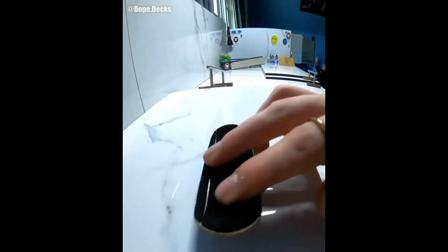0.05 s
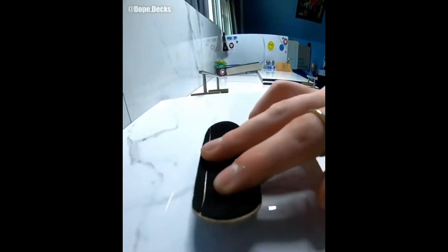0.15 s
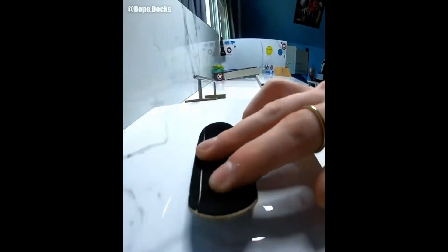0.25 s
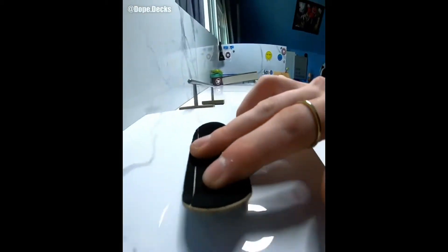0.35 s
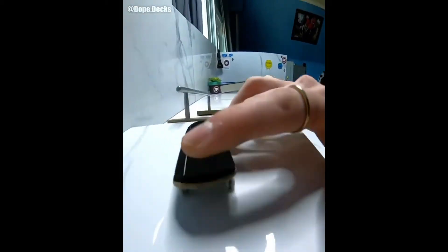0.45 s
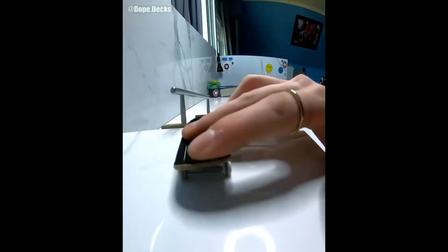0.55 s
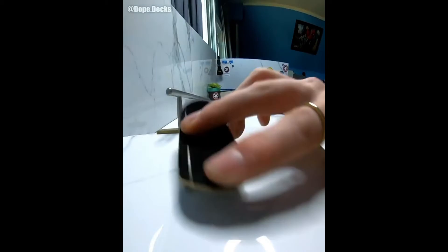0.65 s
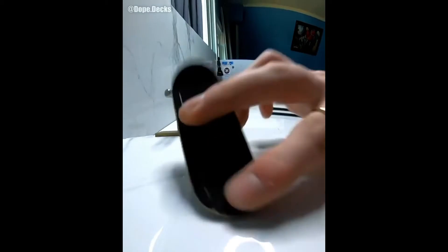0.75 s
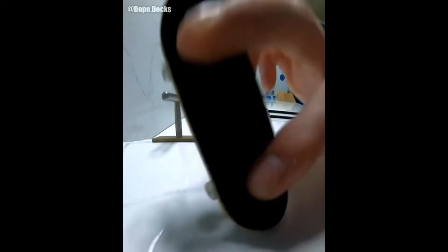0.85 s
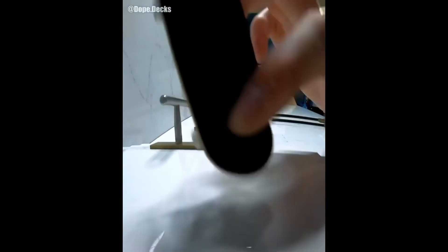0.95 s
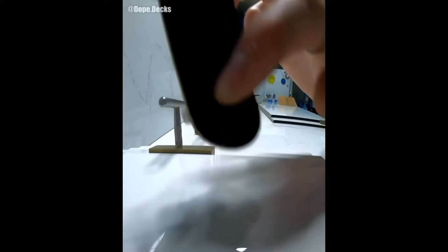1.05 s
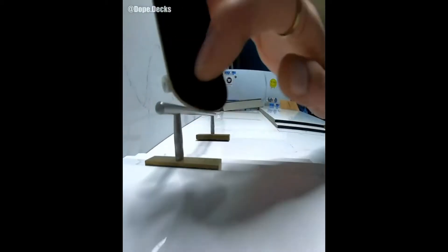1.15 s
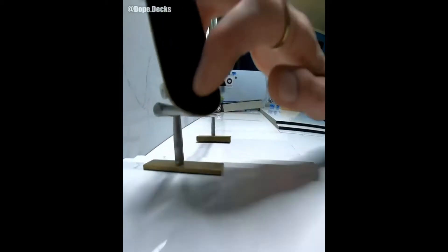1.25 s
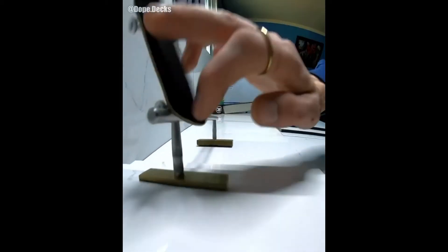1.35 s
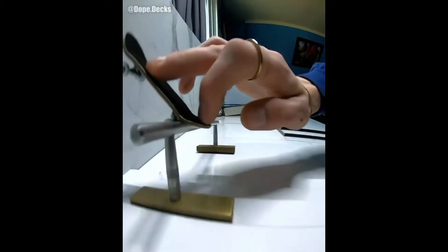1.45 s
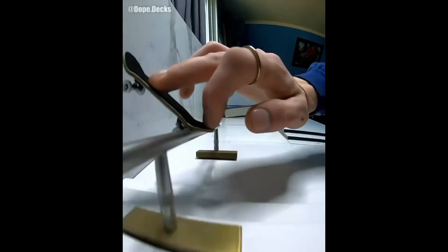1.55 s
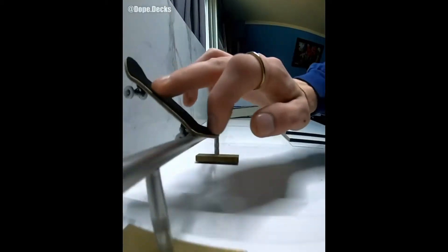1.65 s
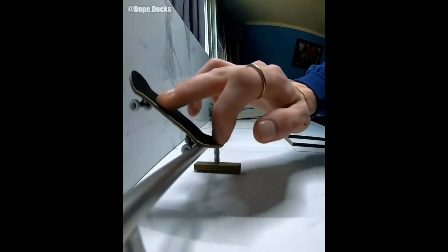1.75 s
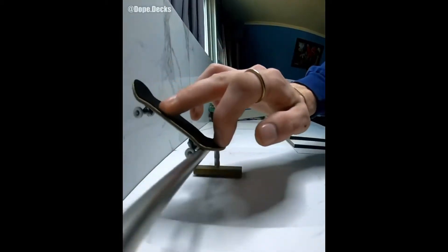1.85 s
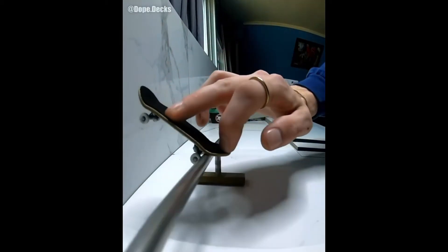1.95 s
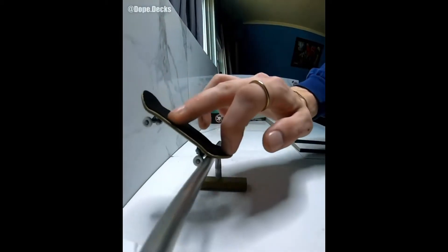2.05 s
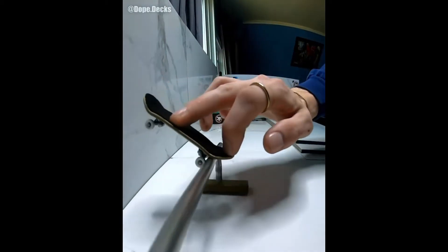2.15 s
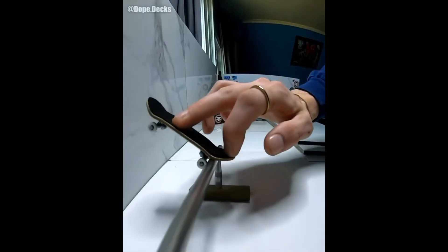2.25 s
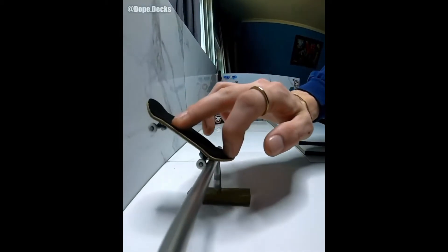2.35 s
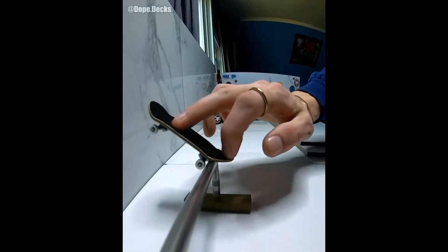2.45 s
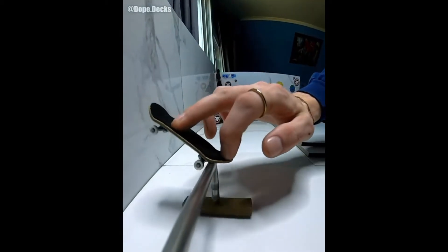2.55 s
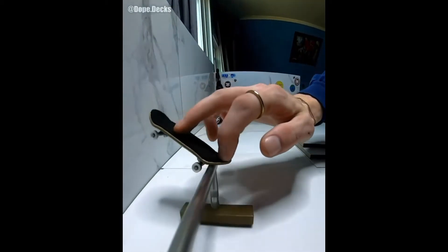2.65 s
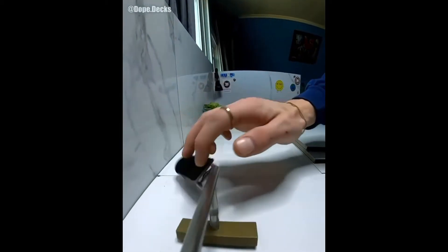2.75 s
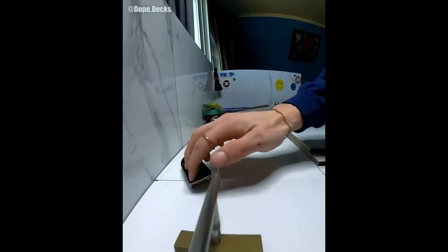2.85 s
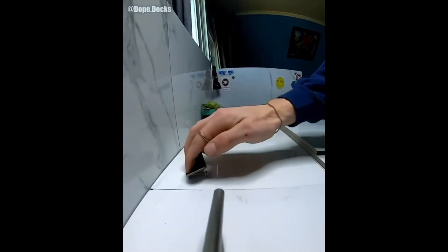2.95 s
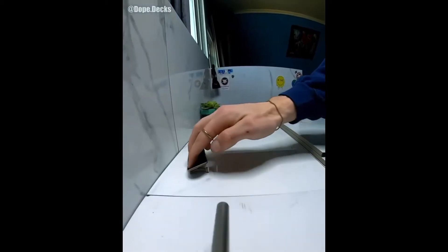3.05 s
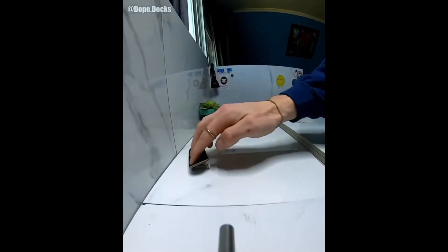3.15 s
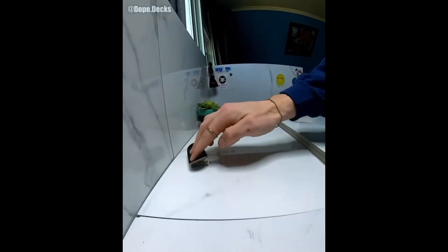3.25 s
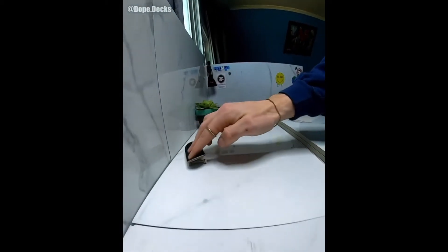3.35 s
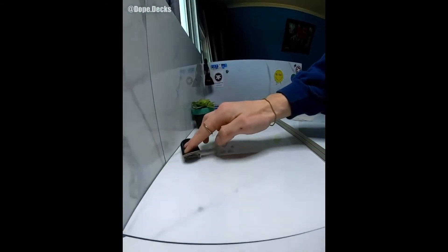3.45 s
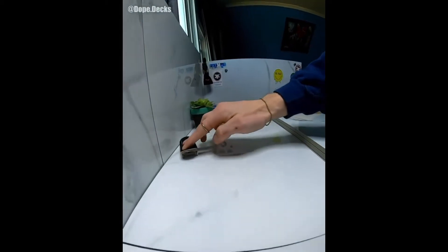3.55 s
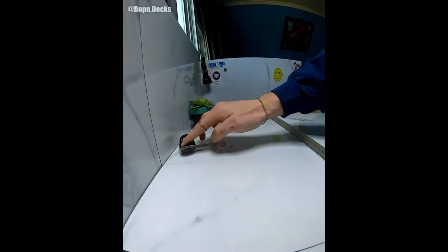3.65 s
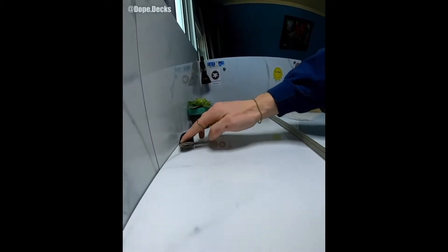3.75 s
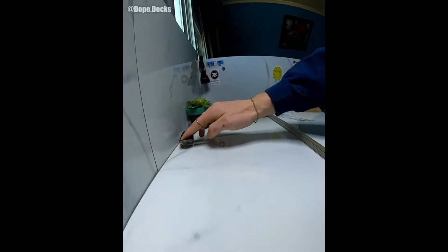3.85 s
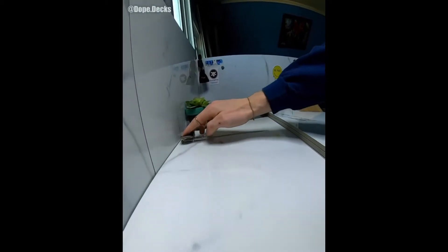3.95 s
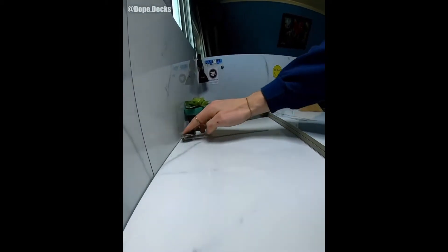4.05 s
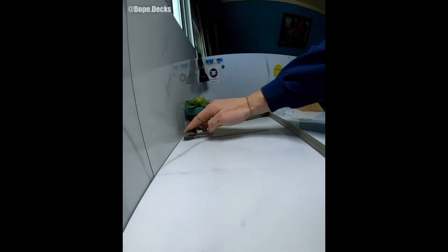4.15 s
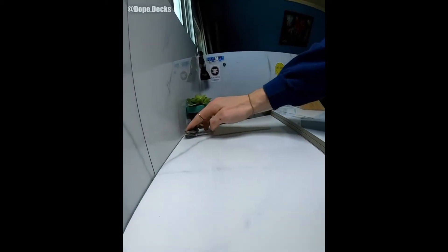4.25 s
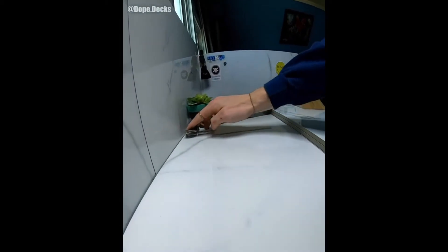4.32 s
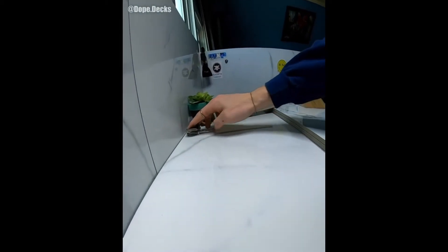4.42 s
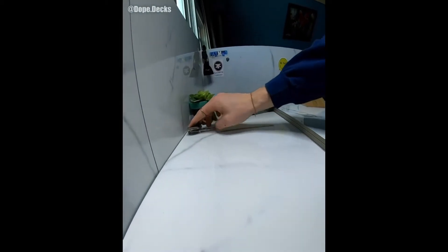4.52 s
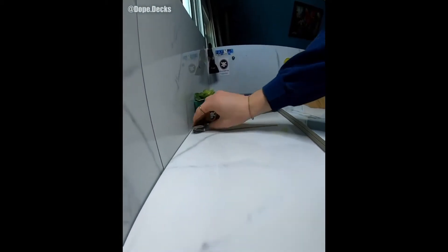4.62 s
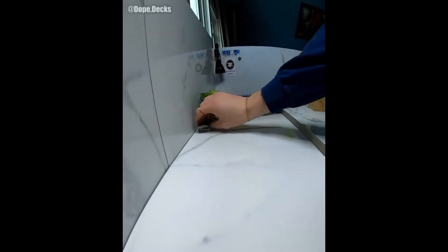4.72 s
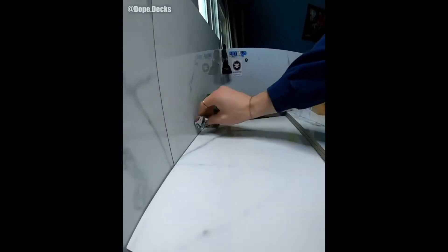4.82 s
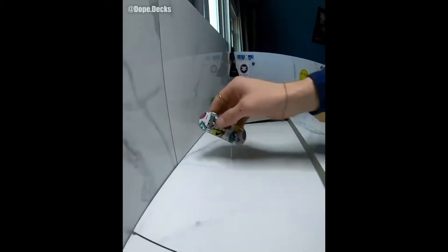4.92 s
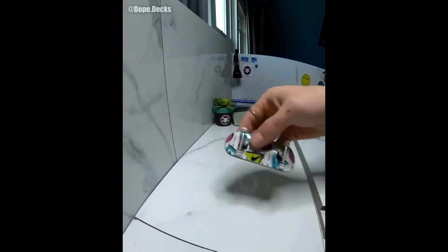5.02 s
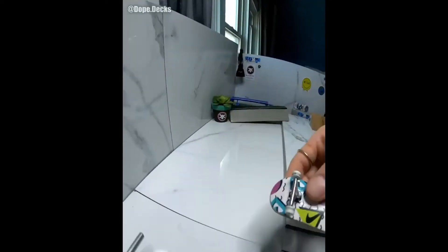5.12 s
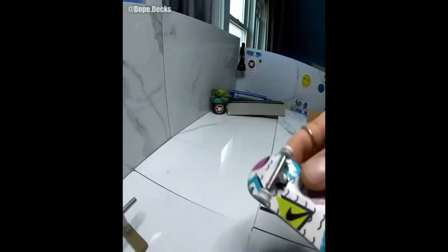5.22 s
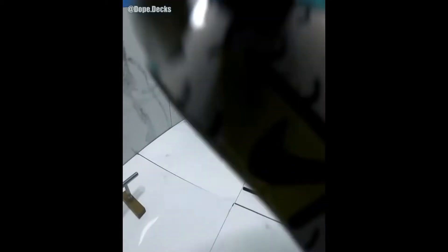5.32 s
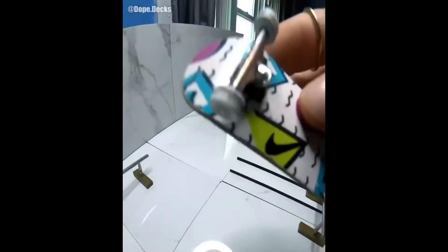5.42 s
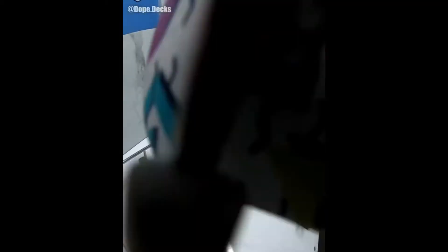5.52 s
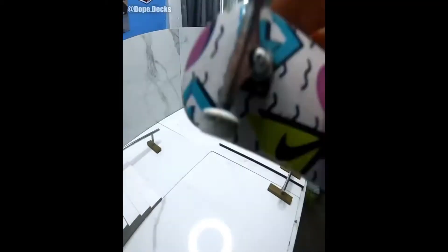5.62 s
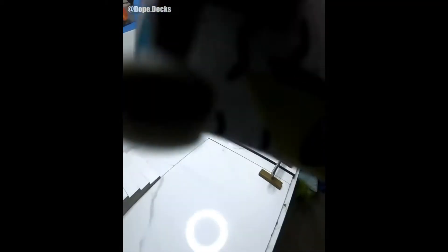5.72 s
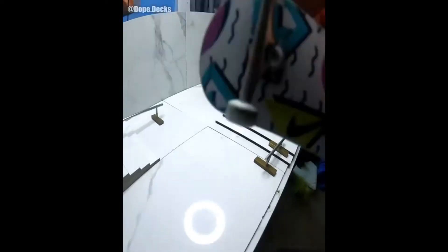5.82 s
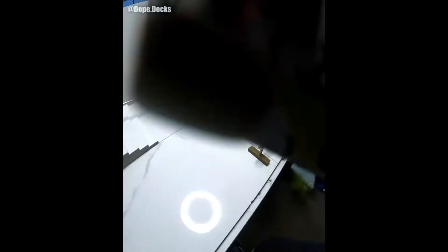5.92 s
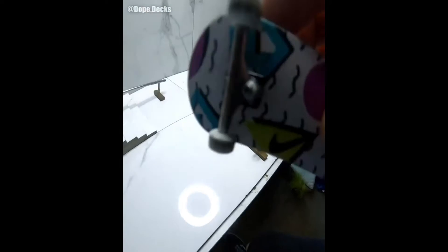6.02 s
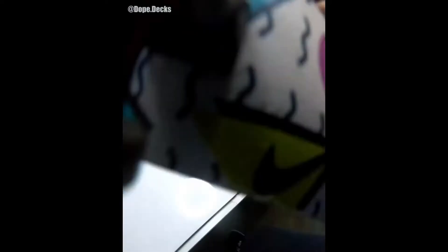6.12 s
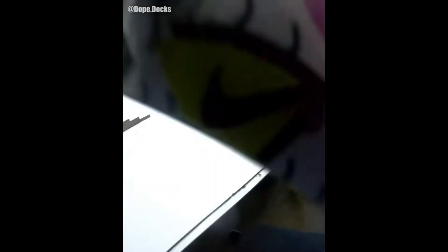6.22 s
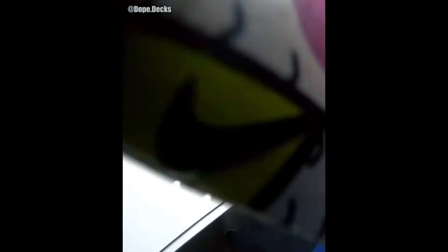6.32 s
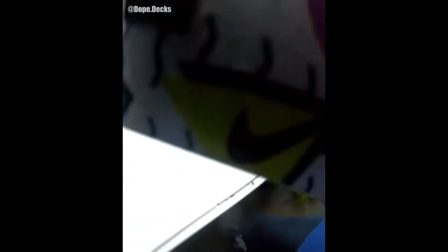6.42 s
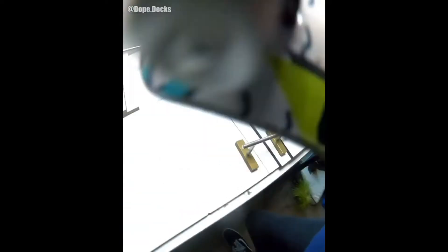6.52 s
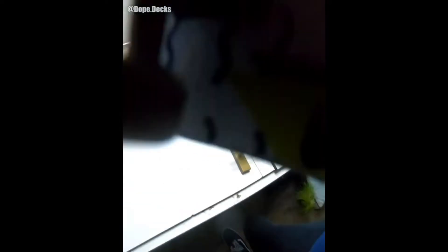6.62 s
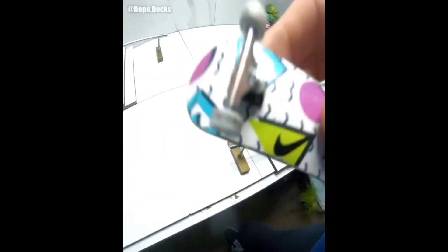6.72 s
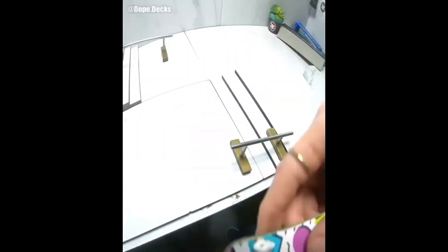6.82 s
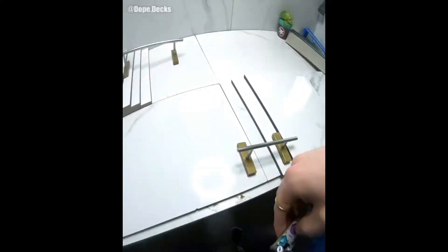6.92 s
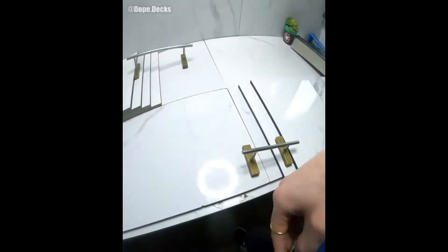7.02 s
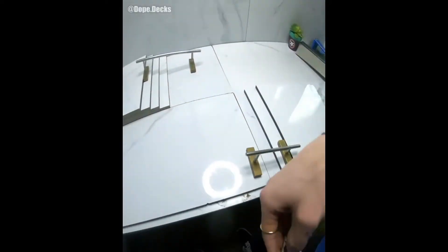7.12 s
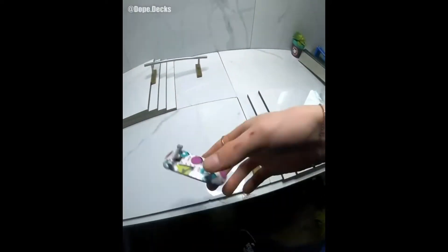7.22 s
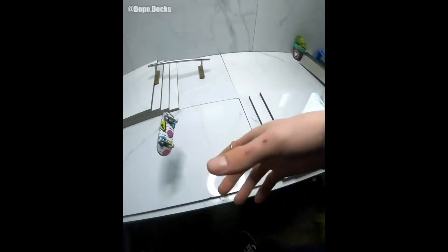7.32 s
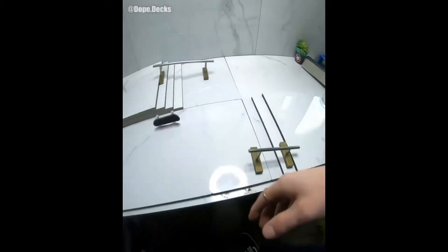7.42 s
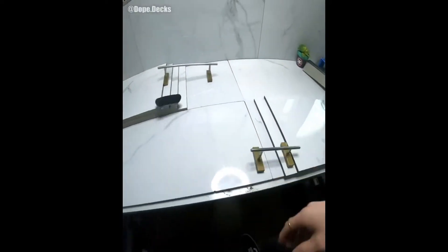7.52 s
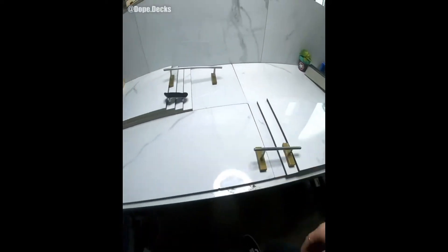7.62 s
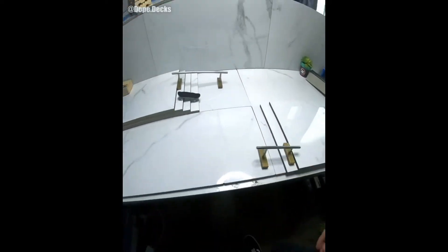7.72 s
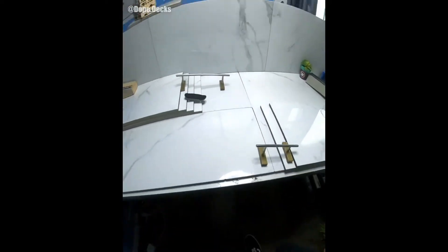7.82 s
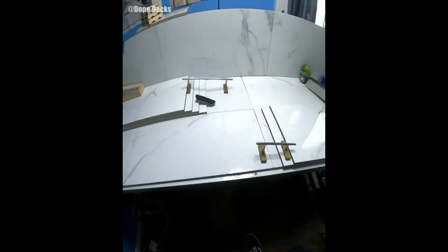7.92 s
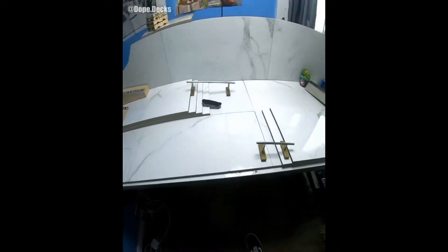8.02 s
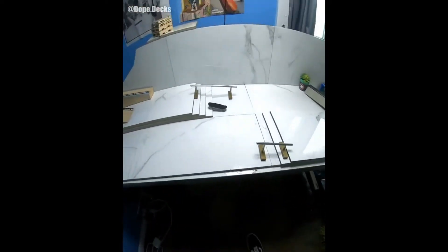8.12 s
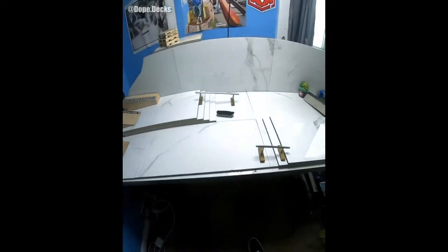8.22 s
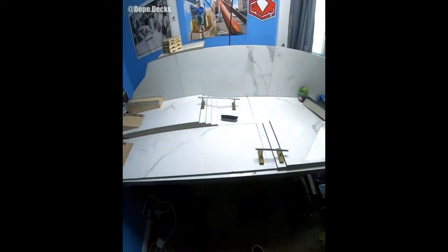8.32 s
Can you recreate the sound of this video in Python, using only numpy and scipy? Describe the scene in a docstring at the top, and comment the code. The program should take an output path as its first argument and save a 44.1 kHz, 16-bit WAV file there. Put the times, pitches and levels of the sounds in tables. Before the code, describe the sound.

Close camera microphone in a small hard-surfaced room. A finger-sized wooden skateboard rolls noisily, pops with a sharp tail crack in slow motion, lands on a metal rail and scrapes with brief bending squeaks. It slaps down in a burst of wheel and truck clicks, rolls away more softly and knocks the wall. A grab click, then eight heavy overloaded taps on the casing with short rushes and light rattles, then a toss and quickening, fading desk bounces.

```python
"""Small wheels roll over a stone-topped desk; a fingerboard pops in slow motion, grinds a metal rail with squeaks,
slaps down and rolls into the wall. Picked up, it taps the camera eight times, then is tossed and bounces to rest.
Wheels, scrapes and air are coloured noise; squeaks are bending stick-slip tones; blows are clicks with chatter and room
echo through a deck or camera case, with damped modes of desk, rail and trucks.
Slow playback lowers the blows and the end of the run-up, and stretches the blows' ring and echo."""
import sys
import numpy as np
from scipy import signal
from scipy.fft import rfft, irfft
from scipy.io import wavfile
from scipy.ndimage import uniform_filter1d, map_coordinates

SR = 44100
rng = np.random.default_rng(int(sys.argv[2]) if len(sys.argv) > 2 else 0)


def dump(signal):
    """Clip the signal to [-1, 1] and save it as 16-bit WAV at the path in sys.argv[1]."""
    limited = np.clip(np.atleast_2d(signal).T, -1, 1)
    pcm = np.round(limited * 32767).astype(np.int16)
    wavfile.write(sys.argv[1], SR, pcm)


N = 369110
TIME = np.arange(N) / SR
SIZE = 32768  # samples in one short sound or filter
AGE = np.arange(SIZE) / SR
MIDDLE_S = AGE.mean()
HZ = np.maximum(np.fft.rfftfreq(SIZE, 1 / SR), 1)
TOP_HZ = 12900  # upper limit of the microphone sound
POP_S, SKID_S, WALL_S = 0.722, 2.8, 4.064  # run-up ends, wheels skid after landing, wheels stop at the wall

# Playback speed: (time [s], share of real time)
SPEED = [(0, 1), (.487, 1), (.503, .33), (1.3, .33), (1.328, .55), (2.72, .56), (2.74, 1), (8.4, 1)]
# Resonances of the wooden deck: (frequency [Hz], width [Hz], relative level [dB])
DECK = [(710, 600, -4), (1155, 280, -6), (1840, 770, -4), (2200, 300, -10), (2600, 240, -7.5),
        (2990, 460, -7.5), (3350, 310, -4.5), (3880, 560, -6.5), (4200, 660, -9), (5650, 490, -5.5),
        (6710, 130, -7), (8450, 590, -15), (10200, 350, -28)]
# Resonances of the camera case: (frequency [Hz], width [Hz], relative level [dB])
CASE = [(193.5, 204, 11), (360, 120, 8.5), (624, 150, -2.5), (1236, 370, 4), (2520, 330, 0),
        (3300, 610, -6.5), (4630, 580, -4.5), (6950, 260, -28), (9820, 1200, -21.5)]
# Modes of the desk at full speed: (frequency [Hz], relative level [dB], t60 [s])
DESK = [(77.7, -12.5, 0.087), (174.2, -14, 0.99), (259, -6.5, 0.15), (357.6, 6.5, 0.17), (682, -3, 0.09),
        (1100, -6.5, 0.1)]
# Colour of wheels near the microphone: (frequency [Hz], relative level [dB per Hz])
NEAR_COLOUR = [(88, -44), (150, -16), (239, -12.5), (278, -8), (322, -2.5), (443, -14.5), (597, -8.5),
               (668, -11.5), (1330, 0.5), (2130, -12), (3150, -4), (5510, -18.5), (6280, -29),
               (10200, -38.5), (13000, -59.5)]
# Ways the board makes contact, at full speed:
# (strongest ring [Hz], hardness [dB per octave], desk boom [dB], chatter [dB], clear ring [dB])
TAIL = (2350, 2.5, -18.5, -8, -7.5)
DECK_FLAT = (3400.5, -0.5, -34.5, -17, 2)
TRUCK = (3902, 2.5, -21.5, -10, -8)
EDGE = (1899.5, 5, -19, -1.5, -13)
GLANCE = (2400, -0.5, -32, 7, -8.5)
WHEEL = (1598.5, -6, -12, -2.5, -9)
SETTLE = (899.5, -7, -6.5, 5.5, -3.5)
NUDGE = (1700, -4.5, 9.5, 11, -7.5)
GRAB = (2603, 1, -7, -0.5, -4.5)
SEAM = (8100, 13, -16, -1, -18)
ROCK = (1199, -2, -13, 15, -7)
WALL = (1450, -5, -19, -2.5, -8)
THUD = (230, -10, -4, 0, 4)


def undb(db):
    """Amplitude gain of a level in dB."""
    return np.exp(np.asarray(db) * np.log(10) / 20)


def unit(x):
    """Scale to an RMS of 1."""
    return x / np.sqrt(np.mean(x ** 2))


def burst(x):
    """Scale a short sound so that its energy equals 20 ms at level 0 dB."""
    energy = np.sum(x ** 2, axis=-1).mean()
    return x / np.sqrt(energy / (.02 * SR))


def curve(rows):
    """Straight lines through (time [s], value) points."""
    return np.interp(TIME, *np.array(rows).T)


def ramp(start_s, end_s):
    """Runs from 0 to 1 between two times."""
    return np.clip((TIME - start_s) / (end_s - start_s), 0, 1)


def hold(start_s, end_s, attack_s, release_s):
    """Envelope that rises until start_s, holds, and dies away after end_s."""
    before = np.maximum(start_s - TIME, 0) / max(attack_s, .0005)
    after = np.maximum(TIME - end_s, 0) / max(release_s, .0005)
    return np.exp(-before - after)


def swells(rows):
    """Gain of bell-shaped swells given as (time [s], half length [s], level [dB])."""
    return sum(undb(db) * np.exp(-.5 * ((TIME - s) / half_s) ** 2) for s, half_s, db in rows)


def fade(t60):
    """Decay by 60 dB in t60 seconds."""
    return undb(-60 * AGE / max(t60, .001))


def flicker(rate):
    """Smooth chance with an RMS of 1, newly drawn about rate times a second."""
    k = int(SR / rate)
    steps = np.repeat(rng.standard_normal(N // k + 1), k)
    return unit(uniform_filter1d(steps, k)[:N])


def noise(size, width):
    """Stereo noise; width is side over mid."""
    mid, side = rng.standard_normal((2, size))
    return unit(np.array([mid + width * side, mid - width * side]))


def narrow(width_hz, width):
    """Slow complex noise that turns a tone into a narrow band."""
    return low_pass(noise(N, width) + 1j * noise(N, width), width_hz, order=2)


def pan(db):
    """Channel gains for a left-minus-right level in dB."""
    return undb(np.array([[db], [-db]]) / 2)


def add(out, s, sound):
    """Mix a sound in at s seconds."""
    i = int(s * SR)
    out[:, i:i + sound.shape[1]] += sound[:, :N - i]


def low_pass(x, hz, order):
    """Causal Butterworth low-pass."""
    return signal.sosfilt(signal.butter(order, hz, fs=SR, output="sos"), x)


def colour(rows):
    """Spectrum in dB, joined up on a logarithmic frequency axis."""
    rows = np.array(rows)
    return np.interp(np.log(HZ), np.log(rows[:, 0]), rows[:, 1])


def resonances(rows, hz):
    """dB response of a set of resonances."""
    power = sum(undb(db) ** 2 / (1 + ((hz - f * f / hz) / width) ** 2) for f, width, db in rows)
    return 10 * np.log10(power)


def bump(hz, centre_hz, octaves):
    """Bell of height 1 around a frequency."""
    return np.exp(-.5 * (np.log2(hz / centre_hz) / octaves) ** 2)


def shape(x, db):
    """Causal filter with the given dB response, built from its cepstrum."""
    cepstrum = irfft(np.log(undb(db)))
    fold = 1 + np.sign(SIZE / 2 - np.arange(SIZE))
    causal = cepstrum * fold - cepstrum[0] * (AGE == 0)
    response = irfft(np.exp(rfft(causal)))
    return signal.fftconvolve(x, response[None], axes=1)[:, :x.shape[1]]


def comb(depth_db, longest_s):
    """Reflections off nearby surfaces cut peaks and notches into a sound: dB response."""
    lags, turns = rng.random((2, 12))
    coarse = HZ[::4]
    cycles = np.outer(coarse, longest_s * (.2 + .8 * lags)) + turns
    ripple = np.cos(2 * np.pi * cycles).sum(axis=1)
    return depth_db * unit(np.interp(HZ, coarse, ripple)) * HZ / (HZ + 1200)


def bend(x, lag_s, speed):
    """Bending waves carry the treble faster, so a click spreads into a tiny downward chirp."""
    delay = lag_s / speed / np.sqrt(1 + HZ / (1500 * speed))
    phase = 2 * np.pi * np.cumsum(delay) * SR / SIZE
    tail = np.minimum(10 * (1 - AGE / AGE[-1]), 1)
    return irfft(rfft(x) * np.exp(-1j * phase)) * tail


def ring(modes, speed, scatter=0.017, uneven_db=0):
    """Damped modes, a little different in pitch (and in strength if uneven) on every blow."""
    out = np.zeros(SIZE)
    for hz, db, t60 in modes:
        age = AGE[AGE < 2 * t60 / speed]
        detune, strength = rng.standard_normal(2)
        pitch = hz * speed * (1 + scatter * detune)
        decay = np.exp(-np.log(1000) * age * speed / t60)
        out[:len(age)] += decay * undb(db + uneven_db * strength) * np.sin(2 * np.pi * pitch * age)
    return burst(out)


def contact(chatter_db, chatter_t60, room_db, room_t60, width):
    """One sharp push, the grainy chatter of loose parts after it, and the room's answer."""
    grains = undb(3.6 * np.minimum(rng.exponential(size=SIZE), 4))
    chatter = burst(noise(SIZE, width) * grains * fade(chatter_t60))
    room = burst(noise(SIZE, width) * fade(room_t60) * (1 - fade(room_t60 / 10)))
    push = burst(1. * (AGE == 0))
    return push + undb(chatter_db) * chatter + undb(room_db) * room


def in_room(x, chatter_db, room_db, room_t60, width):
    """A sound together with its near reflections and the room's answer."""
    answer = contact(chatter_db, .028, room_db, room_t60, width)
    return signal.fftconvolve(x, answer, axes=1)[:, :N] / np.sqrt(SR / 50)


def friction(rows, body_db, lift_db, rough_db, width):
    """Short rubbing strokes, each bringing out the body's response near its own centre."""
    out = np.zeros((2, N))
    for s, half_s, db, hz in rows:
        grains = noise(SIZE, width) * undb(rough_db * flicker(rate=160)[:SIZE])
        stroke = unit(shape(grains, body_db + lift_db * bump(HZ, hz, octaves=0.34)))
        envelope = np.exp(-.5 * ((AGE - MIDDLE_S) / half_s) ** 2)
        add(out, s - MIDDLE_S, undb(db) * stroke * envelope)
    return out


def rush(db, rise_t60, hold_s, width):
    """A fluttering rush with the given dB response that swells, then holds briefly up to its end."""
    flutter = undb(2.5 * flicker(rate=350)[:SIZE])
    swell = np.minimum(fade(rise_t60) / undb(-60 * hold_s / rise_t60), 1)[::-1]
    return burst(shape(noise(SIZE, width), db + comb(depth_db=3.5, longest_s=.0025)) * flutter * swell)


def judder(x):
    """Four frequency bands of a moving contact each shake on their own."""
    # Edges between the bands: (frequency [Hz])
    band_edges = [700, 1800, 3600]
    below = [0]
    for hz in band_edges:
        below.append(signal.sosfiltfilt(signal.butter(2, hz, fs=SR, output="sos"), x))
    below.append(x)
    return sum((upper - lower) * undb(2.4 * flicker(rate=110)) for lower, upper in zip(below, below[1:]))


def travelling(x, db, depth_db, longest_s):
    """Colour a moving source; the reflections off desk and wall shift as the board travels."""
    turn = 1.19 * flicker(rate=22)
    here, there = (shape(x, db + comb(depth_db, longest_s)) for _ in range(2))
    return unit(here * np.cos(turn) + np.roll(there, shift=400, axis=1) * np.sin(turn))


def wheels(spectrum, grit_db, wobble_db, width):
    """Specks of the surface tick through wheels and desk; the uneven wheels make them come in bunches."""
    # What the rolling wheels ring with: (frequency [Hz], width [Hz], lift [dB])
    peaks = [(340, 240, 5), (1090, 220, 1.5), (2980, 520, 1.5)]
    grit = grit_db * np.minimum(rng.exponential(size=N), 4)
    specks = noise(N, width) * undb(grit + wobble_db * flicker(rate=180))
    lift = sum(lift_db / (1 + (2 * (HZ - hz) / wide) ** 2) for hz, wide, lift_db in peaks)
    return travelling(judder(specks), colour(spectrum) + lift, depth_db=4.0, longest_s=.008)


def deck(push, ring_hz, hardness_db, speed, lift_db):
    """The wooden deck rings most near ring_hz (at full speed), depending on where it is struck."""
    hz = HZ / speed
    hardness = hardness_db * np.log2(np.clip(hz, 500, None) / 2500)
    db = resonances(DECK, hz) + hardness + lift_db * bump(hz, ring_hz, octaves=0.32)
    db = db - 10 * np.log10(1 + np.minimum(hz / TOP_HZ, 1.3) ** 40)  # the top limit sinks with the speed
    struck = shape(push, db + comb(depth_db=2.5, longest_s=0.0052 / speed))
    return burst(bend(struck, lag_s=.0012, speed=speed))


def background():
    """Filtered noise for room air, the rumble of the moving camera, a low hum, and fingers on the board."""
    # Room air: (frequency [Hz], relative level [dB per Hz])
    air_colour = [(53, -32), (90, -4.5), (98, -20.5), (113, -9.5), (220, -3.5), (295, -12.5), (506, -21),
                  (636, -26), (3970, -43), (4230, -47), (4790, -41), (10600, -54), (13000, -56.5)]
    # The camera moves and rumbles: (time [s], half length [s], level [dB])
    camera_moves = [(.3, .22, -45.5), (.92, .25, -47.5), (1.11, 0.026, -34), (1.44, 0.18, -35.5),
                    (2.3, .3, -55), (7.78, 0.089, -47), (7.85, 0.31, -58)]
    # The low hum swells: (time [s], half length [s], level [dB])
    hum_swells = [(3.75, 0.2, -47), (7.2, 0.12, -48)]
    # Fingers shift the board: (time [s], half length [s], level [dB], centre [Hz])
    rubs = [(4.635, 0.025, -56.5, 3050), (4.648, 0.013, -55, 1200), (4.69, 0.056, -61.5, 2520),
            (4.737, 0.0082, -47, 2200), (4.739, 0.013, -48, 1200), (4.8, 0.028, -47, 3300),
            (5.25, 0.049, -61.5, 1496)]
    slowness = 1 - curve(SPEED)
    air = unit(shape(noise(N, width=0.22), colour(air_colour)))
    air = air * undb(-59.5 - 14 * slowness + 1.2 * flicker(rate=2.1))
    rumble_db = 2 * resonances([(30.1, 9, 0.5), (59.96, 29, -6.0)], HZ)
    rumble = unit(shape(noise(N, width=0.3), rumble_db))
    rumble = rumble * (undb(-75.5) + swells(camera_moves))  # the first level is the camera held still
    hum_db = 2 * resonances([(66.3, 6.7, 2.5), (156, 25, -7)], HZ)
    hum = unit(shape(noise(N, width=0.1), hum_db)) * (undb(-64) + swells(hum_swells))
    fingers = friction(rubs, resonances(DECK, HZ), lift_db=17, rough_db=2.0, width=.6)
    return air + rumble + hum + fingers


def singing():
    """Wheel resonances flare up under load and drift; the desk top hums unsteadily under the roll-away."""
    # A wheel sings for a moment: (time [s], half length [s], level [dB], centre [Hz])
    wheel_songs = [(0.01, 0.017, -36, 1080), (0.302, 0.016, -34.5, 3130), (0.368, 0.012, -35, 3100),
                   (0.394, .028, -31, 1230), (0.465, 0.014, -25, 1180), (3.105, .025, -47, 930)]
    # The desk top hums, before a 1 dB cut: (time [s], level [dB])
    desk_hum = [(2.86, -51.5), (3.01, -50.5), (3.05, -41), (3.08, -49.5), (3.264, -42), (3.302, -56),
                (3.332, -46), (3.49, -52), (3.516, -43.5), (3.726, -48.5), (3.776, -39.5), (4.04, -50)]
    turns = np.cumsum(1 + 0.015 * flicker(rate=30)) / SR
    grain = narrow(94, width=0.51)
    songs = np.zeros((2, N))
    for s, half_s, db, hz in wheel_songs:
        song = unit(np.real(grain * np.exp(2j * np.pi * hz * turns)))
        songs += song * swells([(s, half_s, db)])
    phase = 2 * np.pi * np.cumsum(350 * (1 + .025 * flicker(rate=90))) / SR  # a wandering 350 Hz
    hum = unit(np.sin(phase) * undb(2 * flicker(rate=55)))
    hum = hum * undb(curve(desk_hum) - 1.0) * hold(SKID_S, WALL_S, .01, .02)
    return songs * pan(db=7) + hum * pan(db=0.5)


def rolling():
    """The run-up grows with the push, then drops into slow motion; the roll-away dulls as the board leaves."""
    # The roll-away, as the fingers press and ease: (time [s], level [dB])
    finger_pressure = [(2.88, -45), (2.922, -53), (3.054, -45), (3.098, -42), (3.26, -53), (3.428, -47.5),
                       (3.438, -50), (3.57, -42.5), (3.91, -44), (4.04, -44)]
    # Wheels farther from the microphone: (frequency [Hz], relative level [dB per Hz])
    far_colour = [(88, -51), (150, -10.5), (222, -8), (278, -19), (354, -13), (396, -11.5), (656, -20.5),
                  (1070, -9.5), (2510, -22), (3330, -17), (4200, -25.5), (4660, -30.5), (5510, -31),
                  (7150, -42), (12100, -55.5), (13000, -68.5)]
    cruise_db, pushed_db, unloaded_db = -33, -28.5, -40
    near = wheels(NEAR_COLOUR, grit_db=4.0, wobble_db=1, width=0.5)
    position = np.cumsum(curve(SPEED))  # samples read at the playback speed
    near = np.array([map_coordinates(channel, [position]) for channel in near])
    near_db = cruise_db + (pushed_db - cruise_db) * ramp(0.17, 0.35)
    near_db = near_db + (unloaded_db - pushed_db) * ramp(0.49, 0.59)  # the weight moves to the tail
    near = near * undb(near_db) * hold(0, POP_S, .005, .005)
    far = wheels(far_colour, grit_db=4.0, wobble_db=1.15, width=.3)
    treble = signal.sosfiltfilt(signal.butter(2, 4200, "high", fs=SR, output="sos"), far)
    closeness = np.exp(-np.maximum(TIME - SKID_S, 0) / 0.14)
    roll = undb(curve(finger_pressure)) * hold(SKID_S, WALL_S, .004, .004)
    skid = undb(-41.5) * hold(SKID_S, SKID_S, .004, 0.039)
    far = (far + undb(20.0) * closeness * treble) * (roll + skid)
    return near * pan(db=4) + far * pan(db=1.5)


def drag():
    """A narrow band of friction noise that sinks as the tail presses down."""
    start_s, start_hz, end_hz = .665, 1118, 746
    hz = start_hz + (end_hz - start_hz) * ramp(start_s, POP_S)
    band = unit(np.real(narrow(170, width=.35) * np.exp(2j * np.pi * np.cumsum(hz) / SR)))
    return undb(-34) * band * hold(start_s, POP_S, 0.019, 0.0045) * pan(db=2.5)


def squeaks():
    """Stick-slip tones bend through three pitches; their partials flare as they cross the rail's resonances."""
    # Squeaks before jitter and room:
    # (time [s], length [s], first pitch [Hz], middle pitch [Hz], last pitch [Hz], level [dB])
    squeak_rows = [(1.374, 0.0098, 1448, 1360, 1250, -37.5), (1.929, 0.052, 1270, 1420, 1310, -51.5),
                   (2.059, 0.044, 1480, 1113, 1040, -33.5), (2.06, 0.02, 2180, 2035, 1780, -36),
                   (2.111, .05, 1170, 1188, 1020, -43), (2.146, .016, 2130, 2070, 2000, -50),
                   (2.388, .016, 1388, 1430, 1484, -51), (2.6, .065, 2170, 2134, 2160, -54)]
    # Partials from the fundamental up: (relative level [dB])
    partials = [-2, -7.5, -15, -18]
    # The rail's response: (frequency [Hz], width [Hz], level [dB])
    rail_body = [(1250, 1000, -1), (2070, 250, 1.5), (3400, 600, -8)]
    attack_s, release_s = .002, 0.0034
    out = np.zeros((1, N))
    jitter = 1 + .017 * flicker(rate=700)[:SIZE]
    age = AGE - MIDDLE_S
    for s, length_s, first_hz, middle_hz, last_hz, db in squeak_rows:
        path = np.polyfit([0, .5, 1], [first_hz, middle_hz, last_hz], 2)
        hz = np.polyval(path, np.clip(age / length_s, 0, 1))
        phase = 2 * np.pi * np.cumsum(hz * jitter) / SR
        tone = 0
        for k, partial_db in enumerate(partials, start=1):
            tone = tone + undb(partial_db + resonances(rail_body, k * hz)) * np.sin(k * phase)
        envelope = np.exp(np.minimum(age, 0) / attack_s - np.maximum(age - length_s, 0) / release_s)
        add(out, s - MIDDLE_S, undb(db) * (unit(tone) * envelope)[None])
    out = out * undb(2.2 * flicker(rate=400))
    return in_room(out, chatter_db=-14, room_db=-9.5, room_t60=0.27, width=0.66)


def rail():
    """The truck strikes the steel rail's modes, scrapes along it as rough noise and breaks into squeaks."""
    # Grinding: (frequency [Hz], relative level [dB per Hz])
    grind_colour = [(180, -75.5), (300, -13.5), (656, -5.5), (715, -8), (767, -5.5), (1160, -7), (1340, -6),
                    (1990, 0), (2500, -3), (4550, -8.5), (6970, -25), (9000, -69), (11700, -100),
                    (19800, -120)]
    # Modes of the struck rail, before the 0.97 speed factor: (frequency [Hz], relative level [dB], t60 [s])
    rail_modes = [(1320, -5, .05), (2172, 3, 0.021), (2440, -9, 0.091), (2470, -10, 0.16),
                  (2910, -12, 0.12), (3400, -13, 0.14), (3970, -6, 0.056), (5040, 0.5, 0.043),
                  (5460, -17, .08)]
    # The truck bites harder: (time [s], half length [s], level [dB], centre [Hz])
    scrapes = [(1.43, .06, -55, 2200), (1.58, 0.011, -55, 1700), (1.6, 0.047, -58, 4490),
               (1.72, 0.055, -58.5, 4400), (2.0, 0.067, -52.5, 1800), (2.082, 0.017, -37.5, 2700),
               (2.14, 0.042, -48.5, 1900), (2.25, 0.028, -51.5, 2400), (2.305, 0.014, -46.5, 1690),
               (2.325, 0.017, -49.5, 750), (2.365, 0.031, -51.5, 1350), (2.60, 0.021, -50, 1960),
               (2.648, 0.015, -48, 2200), (2.704, 0.0096, -58, 700)]
    start_s, end_s = 1.345, 2.665
    grind_db = colour(grind_colour)
    rough = noise(N, width=0.78) * undb(2 * flicker(rate=280))
    scrape = travelling(rough, grind_db, depth_db=5, longest_s=0.0036)
    slide_db = -56.5 - 2 * (TIME - start_s)  # fades by 2 dB per second
    slide = undb(slide_db + 1.0 * flicker(rate=13)) * hold(start_s, end_s, .002, .012)
    bites = friction(scrapes, grind_db, lift_db=12, rough_db=2.0, width=.7)
    out = scrape * slide + bites + squeaks()
    add(out, 1.3386, undb(-29) * ring(rail_modes, 0.97, scatter=0.0029)[None])
    out = low_pass(out, 7200, order=10)  # slow motion takes away the highest treble
    # a thin hiss over the last stretch of rail
    hiss = unit(shape(noise(N, width=0.76), 2 * resonances([(6700, 2300, 0)], HZ)))
    return (out + undb(-66) * hiss * hold(2.493, end_s, .002, .012)) * pan(db=2.5)


def tricks():
    """Pop, rail strike, landing and bump into the wall; the deck rings briefly and the desk booms under each."""
    # The board strikes desk, rail and wall: (time [s], level [dB], kind of contact)
    blows = [(.494, -32.5, SETTLE), (.578, -38, WHEEL), (.606, -41.5, WHEEL), (.725, -17, TAIL),
             (.738, -29, TAIL), (1.171, -57, GLANCE), (1.224, -53.5, GLANCE), (1.247, -32, GLANCE),
             (1.261, -19.5, DECK_FLAT), (1.288, -36, GLANCE), (1.331, -29, GLANCE), (1.338, -24, TRUCK),
             (1.377, -41, GLANCE), (2.716, -24.5, EDGE), (2.812, -33, ROCK), (2.836, -31, ROCK),
             (3.399, -56, SEAM), (4.064, -26, WALL), (4.0883, -32, SETTLE), (4.097, -42, THUD),
             (4.559, -51.5, NUDGE), (4.7634, -25, GRAB)]
    # Wheels and trucks slap down: (time [s], level [dB], strongest ring at full speed [Hz], chatter [dB])
    landing = [(2.7411, -31, 1710, -4.5), (2.75, -25.5, 2105, -1), (2.757, -30.5, 3300, 4),
               (2.763, -21, 3190, 4.5), (2.7736, -21.5, 2900, 3), (2.7801, -28, 1500, 3.5),
               (2.7834, -26.5, 990, 7.5)]
    # hardness 1.5 dB per octave, desk boom -14 dB, clear ring -10.5 dB
    slaps = [(s, db, (ring_hz, 1.5, -14, chatter_db, -10.5)) for s, db, ring_hz, chatter_db in landing]
    out = np.zeros((2, N))
    speeds = curve(SPEED)
    for s, db, (ring_hz, hardness_db, boom_db, chatter_db, ring_db) in blows + slaps:
        speed = speeds[int(s * SR)]
        room_db = -15.5 + max(chatter_db, 0)
        push = contact(chatter_db, 0.039 / speed, room_db, 0.28 / speed, width=1.0)
        high_pass = signal.butter(2, ring_hz * speed / 2, "high", fs=SR, output="sos")
        clear = signal.sosfilt(high_pass, ring([(ring_hz, 0, .011)], speed))
        rings = undb(boom_db) * ring(DESK, speed) + undb(ring_db) * clear
        rings = low_pass(rings, .8 * TOP_HZ * speed, order=6)
        add(out, s, undb(db) * (deck(push, ring_hz, hardness_db, speed, lift_db=8.0) + rings))
    return out * pan(db=1.0)


def rattle(centre_hz, lift_db):
    """Loose trucks shake for an instant, in the middle of the returned sound."""
    grains = noise(SIZE, width=0.1) * undb(2.3 * flicker(rate=450)[:SIZE])
    body_db = resonances(CASE, HZ) + lift_db * bump(HZ, centre_hz, octaves=0.94)
    body_db = body_db + comb(depth_db=1.0, longest_s=0.0061)
    return burst(shape(grains, body_db) * np.exp(-abs(AGE - MIDDLE_S) / 0.01))


def bounce(ring_hz, second_hz, hardness_db, boom_db, near, swell_s):
    """A soft swell leads into each bounce, then deck, trucks and desk ring; far bounces are wetter."""
    # The steel trucks ring on, before the 0.98 speed factor: (frequency [Hz], relative level [dB], t60 [s])
    truck_modes = [(1820, -5, 0.13), (2300, -1.5, .11), (2850, -2, .1), (3268, -6, .09), (3924, -9, 0.22),
                   (4436, -7, .11), (5017, -13, .1), (6540, -9, 0.15), (7000, -5, 0.14)]
    push = contact(-2 if near else 3, 0.072, -10 if near else -2, 0.26, width=0.0046)
    lead = int(swell_s * SR)
    swell = burst(noise(lead, width=0.014) * fade(0.053)[:lead][::-1])
    push = np.hstack([undb(-6.0) * swell, push[:, :-lead]])
    spot = np.exp(0.206 * rng.standard_normal() - .4)  # each spot of the desk has its own pitch
    boom = undb(boom_db) * ring(DESK, spot) * fade(0.64)
    trucks = undb(-12) * ring(truck_modes, 0.98, scatter=0.0035, uneven_db=5)
    # the deck's two rings, set by where it lands
    wood = ring([(ring_hz, 0, .026), (second_hz, -1, .026)], 0.98, scatter=.008)
    wood = burst(signal.fftconvolve(wood, contact(-7, .035, -13, 0.2, width=.01)[0])[:SIZE])
    rings = np.pad(boom + trucks + undb(-4.5) * wood, (lead, 0))[:SIZE]
    return undb(-2.5) * deck(push, ring_hz, hardness_db, 0.93, lift_db=5.0) + rings


def toss():
    """The board leaves the hand with a rattle; a short rush swells into the first bounce, then it tumbles away."""
    # Bounces, pitches before slight speed factors: (time [s], level [dB], hardness [dB per octave],
    # desk boom [dB], strongest ring [Hz], second ring [Hz])
    bounces = [(7.345, -17.5, 0, -16.5, 3185, 1820), (7.412, -27, -0.5, -18, 2600, 1550),
               (7.448, -31.5, -0.5, -27, 2600, 3300), (7.484, -36, -0.5, -25, 3620, 2730),
               (7.5, -38, 1.5, -26, 2830, 4000), (7.524, -34, 0.5, -27, 2200, 3100),
               (7.584, -31.5, 0.5, -11.5, 2900, 1440), (7.668, -27, -1, -8, 2880, 900),
               (7.719, -34, -2, -1.5, 2600, 1250), (7.761, -30, 0, -7.5, 2560, 3610),
               (7.836, -46, -0.5, -14, 2250, 3400), (7.8468, -33, 0.5, -24, 2630, 1850),
               (7.901, -43, -2.5, -20, 2630, 2000), (7.943, -27.5, -1, -13.5, 2920, 3240),
               (8.097, -50, -8, -10, 1600, 1100), (8.126, -30, -1, -15.5, 1250, 3290)]
    coast_s, swell_s = 7.4, .03
    coast_db = -56 - 6 * np.maximum(TIME - coast_s, 0)  # fades by 6 dB per second
    coast = undb(coast_db) * hold(coast_s, TIME[-1], .005, .005)
    out = wheels(NEAR_COLOUR, grit_db=1.5, wobble_db=4.5, width=0.018) * coast
    add(out, 7.294 - MIDDLE_S, undb(-42.5) * rattle(750, lift_db=30))  # the board leaves the fingers
    rush_db = resonances(DECK, HZ) + 6 * bump(HZ, 4100, octaves=0.94) + 10 * bump(HZ, 3210, octaves=0.054)
    lead_in = rush(rush_db, rise_t60=0.042, hold_s=0.013, width=0.087)
    add(out, bounces[0][0] - SIZE / SR, undb(-27) * lead_in)
    for k, (s, db, hardness_db, boom_db, ring_hz, second_hz) in enumerate(bounces):
        first_end = bounce(ring_hz, second_hz, hardness_db, boom_db, k == 0, swell_s)
        add(out, s - swell_s, undb(db) * first_end)
        if k > 0:  # the board's other end follows 34 ms later
            other_end = bounce(ring_hz, second_hz, -6, -10.5, False, swell_s)
            add(out, s + .034 - swell_s, undb(db - 10.5) * other_end)
    return out


def rushes():
    """A short fluttering rush swells into each tap, with a few strong pitches of its own."""
    # Rushes into the taps: (end time [s], level [dB], pitches as (frequency [Hz], relative level [dB]))
    rush_rows = [(5.265, -43.5, [(800, 1.5), (2400, -9.5), (4400, -15)]), (5.441, -37, [(600, 3), (1150, 0),
                 (3300, -13), (5230, -23)]), (5.628, -47, [(1050, 3), (2600, -9), (4700, -12)]),
                 (5.8069, -23.5, [(2530, 0.5), (1230, -13), (550, -14), (3430, -16.5), (8820, -13.5)]),
                 (6.001, -25, [(3280, -3), (1500, 0), (600, -6), (4140, -9), (5800, -9)]),
                 (6.1849, -27, [(330, 3), (600, -10.5), (2540, -8), (4500, -13)]),
                 (6.203, -38.5, [(500, 1.5), (2600, -4), (4500, -10)]), (6.359, -23, [(560, 1), (1130, -8),
                 (2700, -16), (5400, -16), (9500, -17.5)]), (6.5412, -23.5, [(4790, -1.5), (1250, -4),
                 (1850, -9), (5430, -8), (8070, -10.5)])]
    out = np.zeros((2, N))
    tilt_db = 2.3 * np.log2(np.clip(HZ, 100, None) / 1500)
    case = undb(-27 + resonances(CASE, HZ) + tilt_db)
    for s, db, pitches in rush_rows:
        peaks = 0
        for hz, peak_db in pitches:
            peaks = peaks + undb(peak_db + 2 * resonances([(hz, (hz + 2500) / 12, 0)], HZ))
        lead_in = rush(20 * np.log10(peaks + case), rise_t60=0.047, hold_s=0.0094, width=0.11)
        add(out, s - SIZE / SR, undb(db) * lead_in)
    return in_room(out, chatter_db=-26.5, room_db=-20, room_t60=.22, width=0.248)


def crack(ring_hz, hardness_db, chatter_db, width):
    """The camera's case cracks, ringing most near ring_hz, depending on where it is struck."""
    push = contact(chatter_db, 0.0097, -21.5, 0.21, width)
    hardness = hardness_db * np.log2(np.clip(HZ, 300, None) / 1500)
    db = resonances(CASE, HZ) + hardness + 5.5 * bump(HZ, ring_hz, octaves=0.31)
    struck = shape(push, db + comb(depth_db=2.5, longest_s=0.0017))
    return burst(bend(struck, lag_s=0.00079, speed=0.98))


def camera_taps():
    """Each tap cracks and thumps through the camera's case; the trucks rattle and the board rebounds."""
    # The board taps the camera: (time [s], level [dB], hardness [dB per octave], strongest ring [Hz],
    # case thump [dB], rattle level [dB], left minus right [dB])
    taps = [(5.265, -16, 1, 2270, -21.5, -65, 5), (5.2795, -22.5, 1, 2086, -17.5, -70, -4),
            (5.4413, -17.5, 0.5, 3250, -23, -55.5, -1.5), (5.6257, -25, 0.5, 1310, -30.5, -57, 8),
            (5.6284, -21, 0.5, 2060, -19.5, -47.5, 3), (5.8066, -16.5, 0.5, 800, -20, -54.5, 1.5),
            (6.001, -17, 0.5, 900, -19, -49.5, 1.5), (6.1847, -17, -2, 1102, -21, -58, -1),
            (6.203, -25.5, -1.5, 900, -23, -50, 0), (6.3579, -21.5, -2, 1090, -28.5, -45.5, 0.5),
            (6.3602, -18.5, -1.5, 640, -19, -42, 0.5), (6.5397, -23, 1, 2570, -27.5, -46.5, -1.5),
            (6.5423, -21, 0, 500, -21, -44.5, -1.5)]
    # Thump of the case, before slight speed factors: (frequency [Hz], relative level [dB], t60 [s])
    thump_modes = [(35.9, -2, 0.23), (60.5, 0, 0.16), (114, 3.5, 0.044), (217, 2, 0.032),
                   (430, 3.5, 0.0092)]
    # The board rebounds lightly off the case: (time [s], level [dB], strongest ring [Hz])
    rebounds = [(5.310, -43.5, 2800), (5.693, -44, 4400), (6.076, -41.5, 1000), (6.0864, -41.5, 1390),
                (6.238, -45, 1300), (6.2676, -40.5, 2200), (6.4346, -36, 1390), (6.446, -40.5, 2200),
                (6.452, -42, 1400), (6.457, -42.5, 1400), (6.574, -39, 3000), (6.6092, -38.5, 1610)]
    out = np.zeros((2, N))
    for s, db, hardness_db, ring_hz, thump_db, rattle_db, pan_db in taps:
        between_ports = s < 5.7  # the early taps fall between the microphone ports and sound wide
        rocking_db = -2.5 if between_ports else -8  # the case also rocks sideways
        thump = ring(thump_modes, 0.94, scatter=.12)
        rocking = np.array([[1], [-1]]) * np.roll(ring(thump_modes, 0.95), shift=int(0.0043 * SR))
        thump = thump + undb(rocking_db) * rocking
        snap = crack(ring_hz, hardness_db, chatter_db=3.0, width=1.1 if between_ports else .11)
        add(out, s, undb(db) * snap * pan(pan_db) - undb(thump_db) * thump)
        # the loose trucks rattle as the hand pulls back
        add(out, s + .071 - MIDDLE_S, undb(rattle_db) * rattle(centre_hz=4000, lift_db=3.0))
    for s, db, ring_hz in rebounds:
        add(out, s, undb(db) * crack(ring_hz, hardness_db=-2.5, chatter_db=6.5, width=0.11))
    return out + rushes()


def scene():
    """All layers, from the room to the board against the camera."""
    return background() + singing() + rolling() + drag() + rail() + tricks() + toss() + camera_taps()


def record(dry):
    """The loudest cracks overload the recorder; the top is cut."""
    clipped = np.clip(dry, -.87, .87)
    return signal.sosfilt(signal.ellip(8, .2, 70, TOP_HZ, fs=SR, output="sos"), clipped)


dry = scene()
out = record(dry)
dump(out)
```